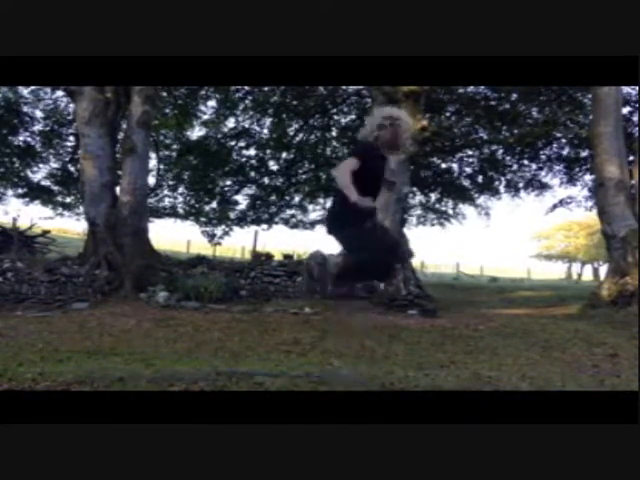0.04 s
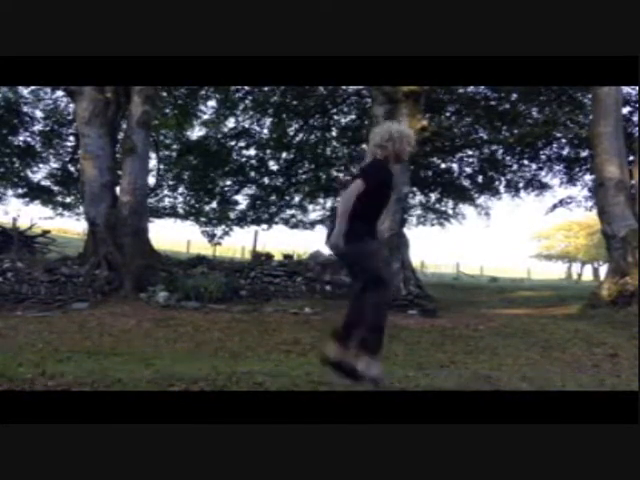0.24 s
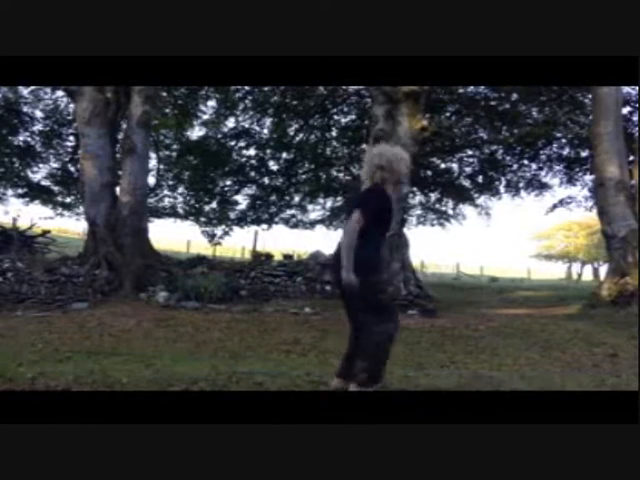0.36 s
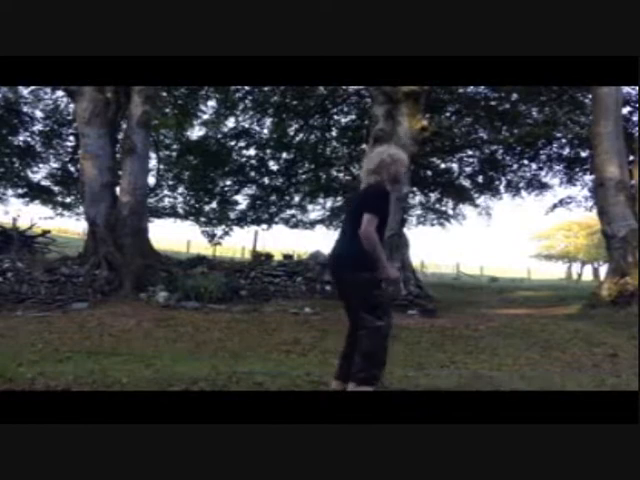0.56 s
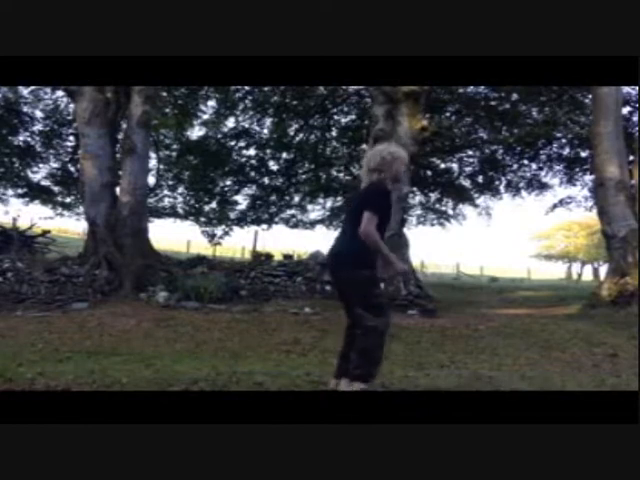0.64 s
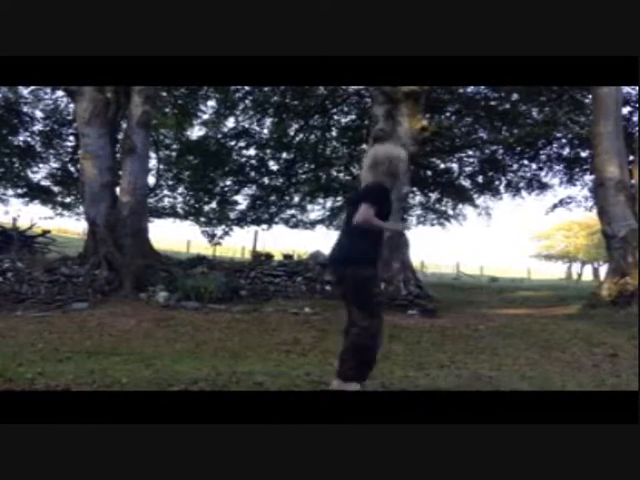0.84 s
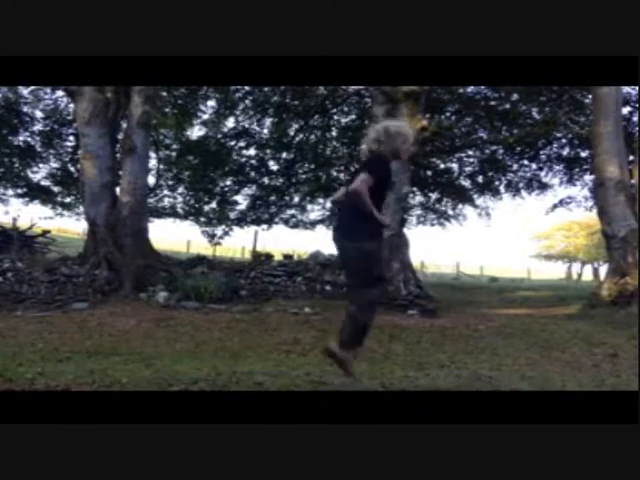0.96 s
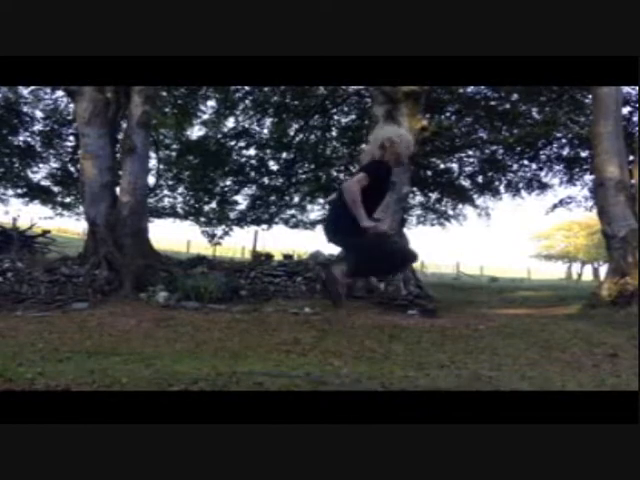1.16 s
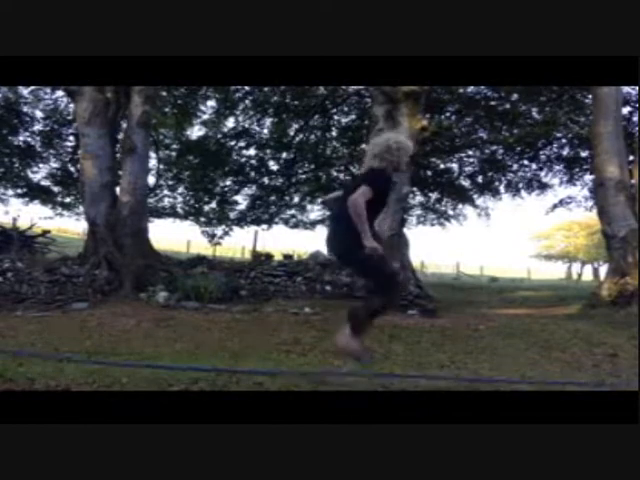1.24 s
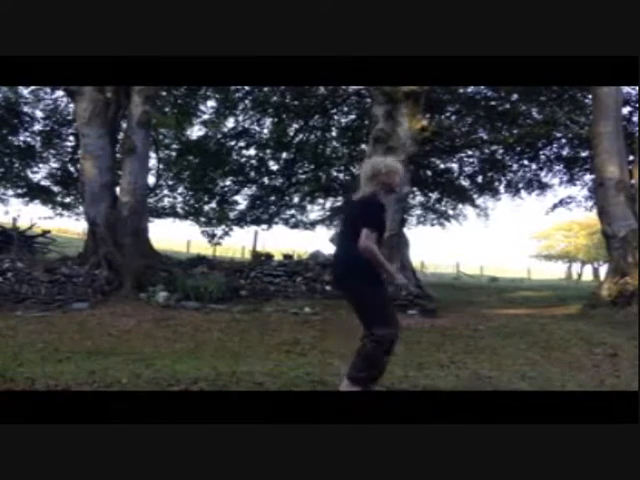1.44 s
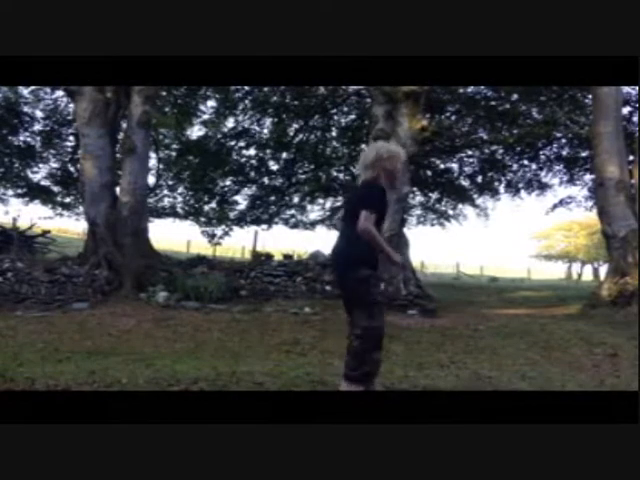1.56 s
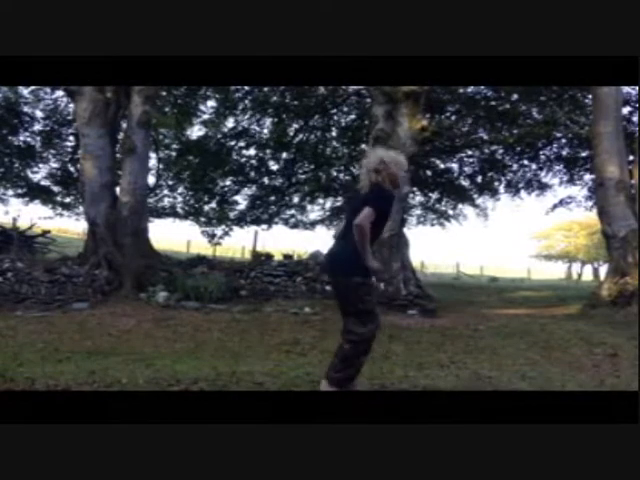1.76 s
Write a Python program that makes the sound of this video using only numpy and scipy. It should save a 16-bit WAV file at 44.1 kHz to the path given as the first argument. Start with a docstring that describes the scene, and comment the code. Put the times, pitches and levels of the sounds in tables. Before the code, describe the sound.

A skipping rope swishes briefly and cracks on the grass at about 0.2 seconds, and feet land softly near 0.5. The handles give a hollow knock around 0.9 seconds, amid faint ticks and rustling of grass and clothes. A second, softer slap comes at 1.3 seconds, followed by a firmer landing at 1.5. Everything is close, with a slight echo from trees and faint moving air.

```python
"""Rope skipping under trees

Someone skips with a long rope on a lawn, close to a small microphone. Shedding vortices, the rope
hums as it swings down; it cracks on the turf and sprays through the grass, and then the feet land.
Each impact gives damped tones and bursts of contact noise. The handles knock in between, grass
and clothes rustle by friction, and the trees reflect a soft echo over faint moving air."""
import sys
import numpy as np
from scipy import signal
from scipy.fft import rfft, irfft, next_fast_len
from scipy.io import wavfile
from scipy.ndimage import uniform_filter1d

SR = 44100
rng = np.random.default_rng(int(sys.argv[2]) if len(sys.argv) > 2 else 0)


def persist_wave(psi):
    """Save psi, clipped to +-1, as 16-bit WAV."""
    counts = np.round(np.clip(psi, -1, 1) * 32767).astype(np.int16)
    wavfile.write(sys.argv[1], SR, np.atleast_2d(counts).T)


N = 79380
T = np.arange(N) / SR

# Rope strikes on the turf (time [s], thump [dB], patter [dB], crack [dB], spray [dB], swish [dB])
ROPE_STRIKES = [(0.2131, -22, -20.5, -9.5, -23, -33.5), (1.3277, -26.5, -22.5, -19.5, -26.5, -44.5)]
# Spectrum of a sharp impact (frequency [Hz], level [dB])
CRACK_SPECTRUM = [(100, -28), (800, 16), (2000, -1.5), (3800, 4.5), (6000, -8), (11000, -2.5)]
# Spectrum of brushed blades and leaves (frequency [Hz], level [dB])
GRASS_SPECTRUM = [(100, -76), (700, -0.5), (2000, -4.5), (3200, -5), (5000, 0), (6500, -0.5), (8500, 1),
                  (11000, -3)]
# Spectrum of a dull scuff or rattle (frequency [Hz], level [dB])
SCUFF_SPECTRUM = [(30, -41), (90, -16.5), (180, 1.5), (280, -6), (370, 3.5), (600, -2.5), (1000, -4.5),
                  (1600, -8.5), (2500, -15), (5000, -19.5), (11000, -80)]


def rope_slaps():
    """Impact: the rope cracks, lands with a short hollow ring, patters down and whips the grass."""
    # Stretches of rope meet the turf (time [s], level [dB], frequency ratio [1])
    contacts = [(0.2131, -13.5, 1.06), (0.2162, -9, 1.003), (1.3284, -9.5, 1.019), (1.3358, -25, 1.3)]
    # Ringing tones of the slap (frequency [Hz], level [dB], 60 dB decay time [s])
    slap_tones = [(372, -22, .035), (535, -21, .03), (722, -10, .035), (850, -9, .02), (990, -3, .028),
                  (1250, -13, .022)]
    # Spectrum of the rope lying down (frequency [Hz], level [dB])
    patter_spectrum = [(30, -56), (90, -27.5), (180, 0.5), (290, -5.5), (380, 5), (600, 2.5), (900, 7),
                       (1300, -2), (2000, -8.5), (4000, -12), (11000, -42)]
    thud = sum(amp(db) * ring(at, slap_tones, pitch) for at, db, pitch in contacts)
    patter, crack, spray = 0, 0, 0
    for at, thump_db, patter_db, crack_db, spray_db, _ in ROPE_STRIKES:
        thud += amp(thump_db) * soil_thump(at)
        patter += amp(patter_db) * burst(at + 0.0022, 0.0024, 0.017)
        crack += amp(crack_db) * burst(at, 0.0008, 0.0032)
        plateau = np.minimum(burst(at - 0.0005, 0.00054, 9), burst(at + 0.011, 9, 0.021))
        spray += amp(spray_db) * plateau
    return (thud + colour(patter * grains(4.2), patter_spectrum)
            + colour(crack * grains(0.5), CRACK_SPECTRUM)
            + colour(spray * grains(4.2), GRASS_SPECTRUM))


def rope_swish():
    """Aeolian tone: vortex shedding hums higher and louder as the rope speeds to the ground."""
    slow_hz, fast_hz, roughness = 107.6, 198.2, 0.7
    swish = 0
    for at, *_, db in ROPE_STRIKES:
        hz = slow_hz + (fast_hz - slow_hz) * burst(at, rise_s=0.0613, decay_s=0.205)
        phase = 2 * np.pi * np.cumsum(hz) / SR
        eddies = drift(110) * np.sin(phase) + drift(110) * np.cos(phase)
        hum = (1 - roughness) * np.sin(phase) + roughness * eddies
        swish += amp(db) * burst(at, rise_s=0.055, decay_s=0.005) * hum
    return swish


def feet():
    """Impact and friction: the soles tap and thud on the soil and scuff the grass."""
    # Landings (time [s], thud [dB], frequency ratio [1], thump [dB], tap [dB], scuff [dB])
    landings = [(0.4715, -25.5, 1.244, -30, -21, -36.5), (0.4825, -47, 1.2, -36, -27.5, -39.5),
                (1.4924, -12.5, 1.08, -38, -21, -30.5), (1.5014, -18.5, 1.004, -37, -42, -44)]
    # Ringing tones of a footfall (frequency [Hz], level [dB], 60 dB decay time [s])
    footfall_tones = [(362, -7, .04), (480, -18, .025), (965, -2, .02), (1280, -11, .014)]
    # Spectrum of a sole's tap (frequency [Hz], level [dB])
    tap_spectrum = [(100, -9), (500, 5), (1100, 4), (2000, -11.5), (3500, -14), (6000, -18), (11000, -28)]
    thud, tap, scuff = 0, 0, 0
    for at, thud_db, pitch, thump_db, tap_db, scuff_db in landings:
        thud += amp(thud_db) * ring(at, footfall_tones, pitch) + amp(thump_db) * soil_thump(at)
        tap += amp(tap_db) * burst(at + 0.0015, 0.0009, 0.0009)
        scuff += amp(scuff_db) * burst(at + 0.0013, 0.016, 0.021)
    return (thud + colour(tap * grains(0.49), tap_spectrum)
            + colour(scuff * grains(3.5, samples=80), SCUFF_SPECTRUM))


def soil_thump(at, hz=203.3, rise_s=0.0065):
    """Compliance: soft soil gives way under a blow in a short, low, damped oscillation."""
    age = np.maximum(T - at, 0)
    swell = (age / rise_s) ** 2 * np.exp(2 - 2 * age / rise_s)
    return swell * np.sin(2 * np.pi * hz * age)


def handles():
    """Free vibration: each knock leaves a short hollow ring, with a tick and a rattle."""
    # Knocks of the handles (time [s], ring [dB], rattle [dB], tick [dB])
    knocks = [(0.0541, -55, -35, -31), (0.9017, -29.5, -36.5, -32), (0.9175, -16.5, -45.5, -33.5),
              (1.0866, -42, -46, -36), (1.1841, -40.5, -56.5, -51)]
    # Modes of a handle (frequency [Hz], level [dB], 60 dB decay time [s])
    handle_modes = [(380, -53, 0.09), (938, -2.5, 0.029), (1028, -10.5, 0.024), (1184, -14, 0.035),
                    (2320, -22, 0.036)]
    body = sum(amp(db) * ring(at, handle_modes) for at, db, _, _ in knocks)
    rattle = sum(amp(db) * burst(at + 0.00076, 0.0047, 0.011) for at, _, db, _ in knocks)
    tick = sum(amp(db) * burst(at, 0.00015, 0.0012) for at, _, _, db in knocks)
    return (body + colour(rattle * grains(4.9, samples=60), SCUFF_SPECTRUM)
            + colour(tick * grains(0.41), CRACK_SPECTRUM))


def rustle():
    """Friction and brittle fracture: grass and clothes brush in swells, and a few dry stalks snap."""
    # Brushes of grass and clothes (time [s], level [dB], rise [s], decay [s])
    brushes = [(0.029, -52, 0.023, 0.017), (0.445, -41, 0.014, 0.0071), (0.479, -38, .018, 0.018),
               (0.608, -50, 0.27, 0.27), (0.72, -40, 0.0017, 0.006), (0.882, -57.5, .06, 0.025),
               (1.081, -50, 0.0072, .012), (1.468, -34.5, 0.00062, 0.021), (1.497, -40, .006, 0.0041),
               (1.621, -44.5, 0.012, 0.013), (1.70, -54.5, 0.18, 0.22)]
    # Snapping stalks (time [s], level [dB])
    stalks = [(0.0533, -35), (0.603, -42), (0.65, -41.5), (0.951, -58), (0.962, -41), (0.979, -53),
              (0.998, -50.5), (1.289, -48)]
    # Spectrum of a snap (frequency [Hz], level [dB])
    snap_spectrum = [(100, -22), (2000, -20), (3300, -24), (5000, 4), (7000, -15), (9000, 13.5),
                     (11000, -6)]
    swell = sum(amp(db) * burst(at, rise, decay) for at, db, rise, decay in brushes)
    brushing = swell * grains(4.26) * amp(2.3 * drift(70.07))
    snaps = sum(amp(db) * burst(at, 0.0003, 0.0011) for at, db in stalks)
    return colour(brushing, GRASS_SPECTRUM) + colour(snaps * grains(0.7), snap_spectrum)


def clothes():
    """Air displacement and friction: loose cloth flaps in low puffs and rubs as the arms sweep up."""
    # Flaps of cloth (time [s], level [dB], rise [s], decay [s])
    flaps = [(0.077, -44.5, 0.003, 0.0098), (0.37, -46, 0.06, 0.032), (0.819, -60.5, 0.04, 0.048),
             (1.064, -45.5, 0.012, 0.013), (1.664, -50, 0.02, 0.0087)]
    # Spectrum of a flap (frequency [Hz], level [dB])
    flap_spectrum = [(30, -36.5), (80, -8), (130, -3.5), (190, -6), (280, -21.5), (380, -14), (700, -28),
                     (3000, -25), (11000, -33)]
    # Spectrum of rubbing cloth (frequency [Hz], level [dB])
    rub_spectrum = [(100, -19), (500, -9.5), (900, 5), (1500, 5), (2200, -9), (4000, -8), (11000, -39)]
    puffs = sum(amp(db) * burst(at, rise, decay) for at, db, rise, decay in flaps)
    rub = amp(-47.5) * burst(at=0.96, rise_s=0.057, decay_s=0.073)
    return colour(puffs * grains(1), flap_spectrum) + colour(rub * grains(4.7), rub_spectrum)


def grove_echo(direct):
    """Reflection and scattering: a near echo, a dull slap from trunks, a diffuse wash from the canopy."""
    # Frequency response of the scattering trees (frequency [Hz], gain [dB])
    tree_response = [(40, -20), (120, 7), (200, -7.5), (290, 8), (380, -4.5), (600, -5.5), (1000, -5.5),
                     (2000, 0.5), (5000, 3), (11000, 1.5)]
    build_s, decay_s, canopy_delay_s, canopy_width_s = 0.027, 0.07, 0.091, 0.023
    wash = rng.standard_normal(N) * (1 - np.exp(-T / build_s)) * np.exp(-T / decay_s)
    canopy = rng.standard_normal(N) * np.exp(-0.5 * ((T - canopy_delay_s) / canopy_width_s) ** 2)
    response = amp(-17) * wash / np.linalg.norm(wash) + amp(-19) * canopy / np.linalg.norm(canopy)
    scattered = signal.fftconvolve(direct, response)[:N]
    trunk_band = signal.butter(2, [344, 1430], "band", fs=SR, output="sos")
    trunks = amp(-19.5) * signal.sosfilt(trunk_band, delay(direct, lag_s=0.0672))
    near = amp(-18.5) * delay(direct, lag_s=0.006)
    return near + trunks + colour(scattered, tree_response, normalise=False)


def breeze():
    """Flow noise: softly moving air swells and ebbs beside a faint crackle of leaves."""
    # Spectrum of moving air (frequency [Hz], level [dB])
    air_spectrum = [(25, -18), (60, 20), (110, 19.5), (170, 9), (260, 4.5), (500, 1.5), (950, 6),
                    (1500, 1.5), (3000, 0), (6000, -12), (11000, -29.5)]
    air = amp(-60.5) * colour(rng.standard_normal(N), air_spectrum) * amp(2 * drift(4.2))
    leaves = amp(-73.5) * colour(grains(3.6), GRASS_SPECTRUM) * amp(drift(33))
    return air + leaves


def amp(db):
    """Amplitude ratio of a level in decibels."""
    return 10 ** (np.asarray(db) / 20)


def colour(x, spectrum, normalise=True):
    """Minimum-phase filtering; normalised, white noise roughly keeps its power."""
    size = next_fast_len(2 * N)
    hz, db = np.array(spectrum, float).T
    bin_hz = np.arange(size // 2 + 1) * SR / size
    gain = amp(np.interp(np.log(bin_hz + 1), np.log(hz), db))
    if normalise:
        gain /= np.sqrt(np.mean(gain[:size // 4] ** 2) / 2)
    cepstrum = irfft(np.log(gain), size)
    cepstrum[1:size // 2] *= 2  # folding onto positive time makes the filter causal
    cepstrum[size // 2 + 1:] = 0
    return irfft(rfft(x, size) * np.exp(rfft(cepstrum)), size)[:N]


def burst(at, rise_s, decay_s):
    """Exponential growth to a peak of 1, then exponential decay."""
    return np.exp(np.minimum((T - at) / rise_s, (at - T) / decay_s))


def grains(spread_db, samples=24):
    """Granular noise: tiny contacts of unequal strength, with an rms of 1."""
    noise = rng.standard_normal(N)
    strength = np.repeat(rng.standard_normal(N // samples + 1), samples)[:N].clip(-2, 2)
    noise *= amp(spread_db * strength)
    return noise / noise.std()


def drift(rate_hz):
    """Random modulation: smoothed steps with a standard deviation of 1."""
    hold = int(SR / rate_hz)
    steps = np.repeat(rng.standard_normal(N // hold + 1), hold)
    smooth = uniform_filter1d(uniform_filter1d(steps, hold), hold)[:N]
    return smooth / smooth.std()


def ring(at, tones, pitch=1, contact_s=0.00008):
    """Superposition: damped sinusoids started by one brief contact."""
    age = np.maximum(T - at, 0)
    tone = sum(amp(db) * np.cos(2 * np.pi * hz * pitch * age) * np.exp(-np.log(1000) * age / t60)
               for hz, db, t60 in tones)
    return tone * (1 - np.exp(-age / contact_s))


def delay(x, lag_s):
    """Propagation delay: the same wave arrives later."""
    return np.interp(T - lag_s, T, x, left=0)


def scene():
    """Mid-side stereo: the skipper is straight ahead; the two channels differ only by a faint, delayed treble."""
    # Side signal relative to mid (frequency [Hz], gain [dB])
    side_response = [(60, -45), (250, -63), (900, -60), (2200, -38), (4200, -34), (5800, -43),
                     (7700, -12.5), (11000, -42)]
    direct = rope_slaps() + rope_swish() + feet() + handles() + rustle() + clothes()
    mid = direct + grove_echo(direct) + breeze()
    side = colour(delay(mid, lag_s=0.00059), side_response, normalise=False)
    return np.array([mid + side, mid - side])


def record(dry):
    """Transduction: the microphone thins the bass, colours the low middle, rounds peaks, cuts the top."""
    # Frequency response of the microphone (frequency [Hz], gain [dB])
    microphone_response = [(25, -3), (60, -8.5), (110, -2.5), (190, 1.5), (240, 3), (295, -7), (365, 1.5),
                           (450, -6.5), (530, 1), (610, 1), (720, 1), (1000, 0.5), (2000, -2), (11000, 1)]
    heard = np.array([colour(channel, microphone_response, normalise=False) for channel in dry])
    low_pass = signal.ellip(12, 0.1, 85, 11050, fs=SR, output="sos")
    return signal.sosfilt(low_pass, np.tanh(heard))


dry = scene()
out = record(dry)
persist_wave(out)
```